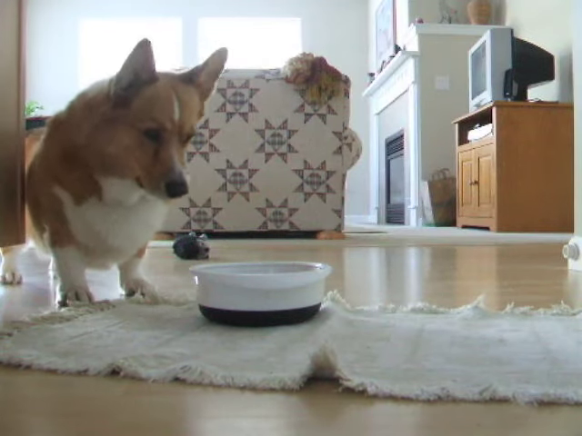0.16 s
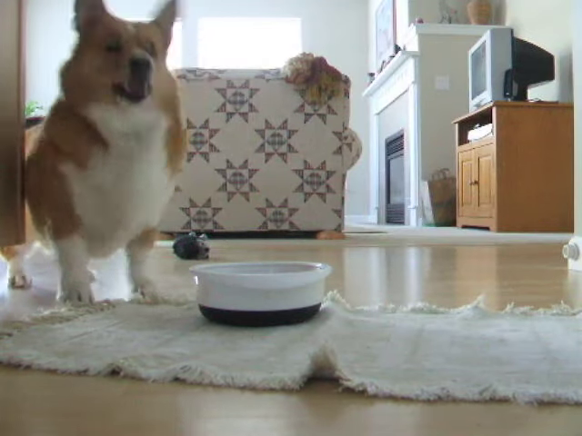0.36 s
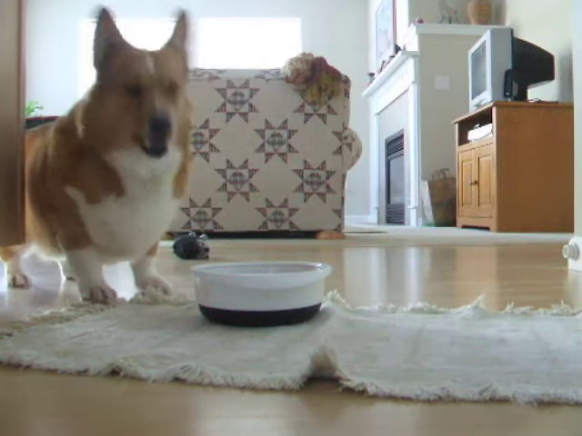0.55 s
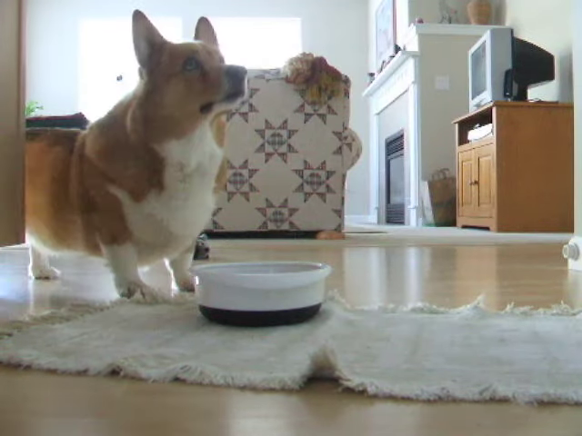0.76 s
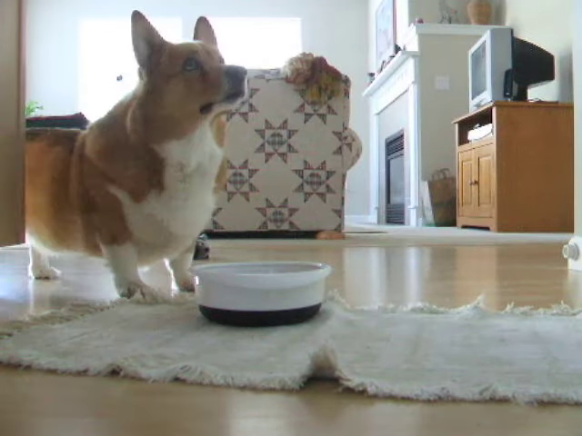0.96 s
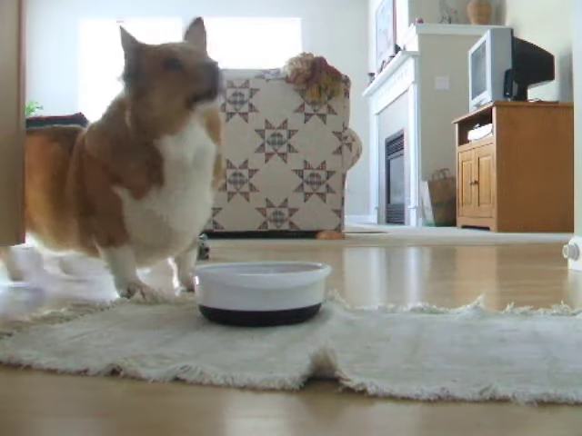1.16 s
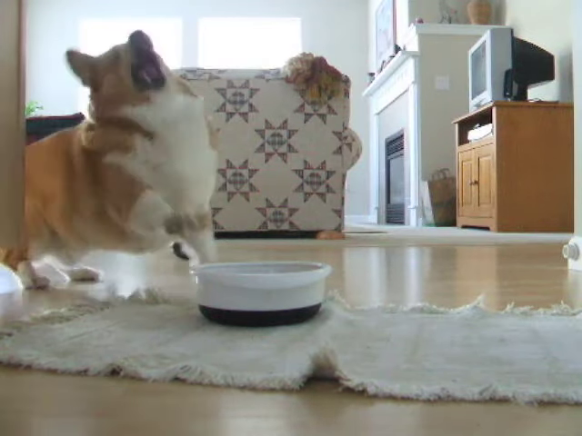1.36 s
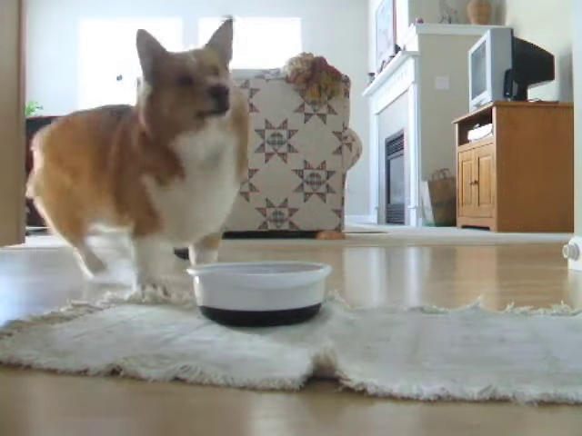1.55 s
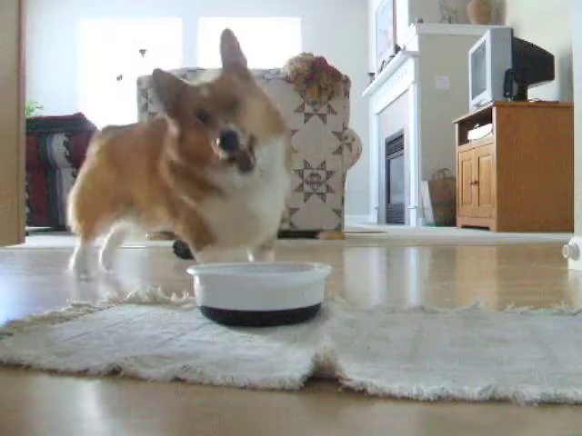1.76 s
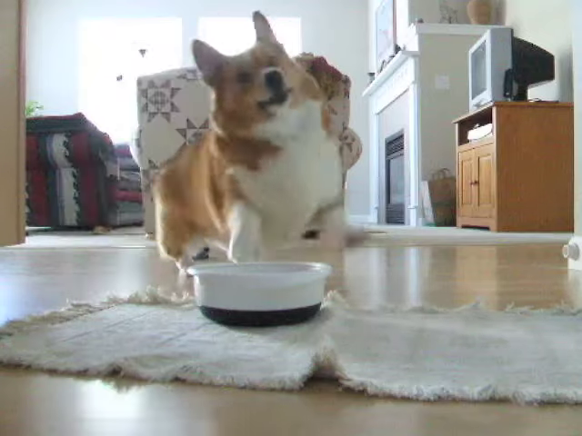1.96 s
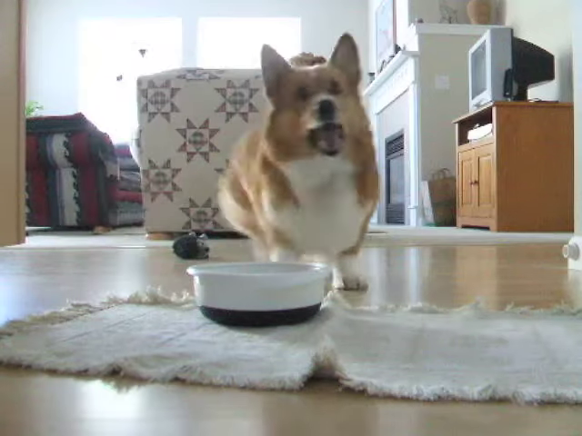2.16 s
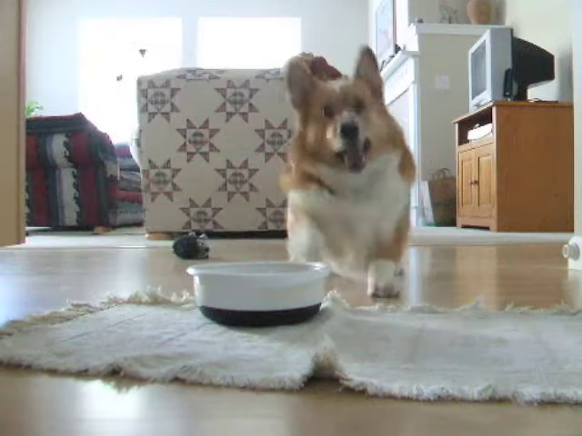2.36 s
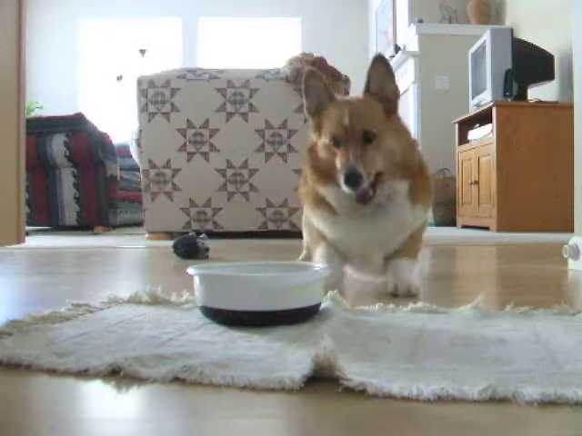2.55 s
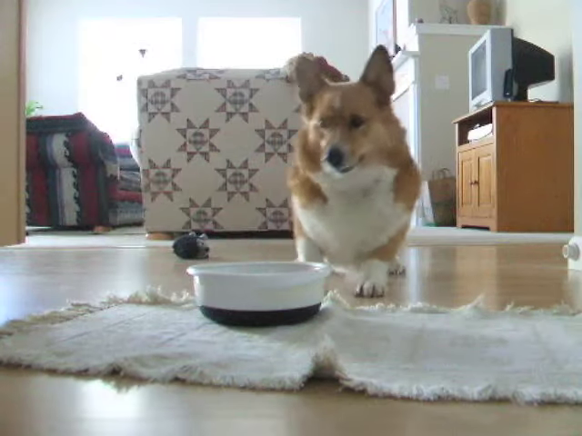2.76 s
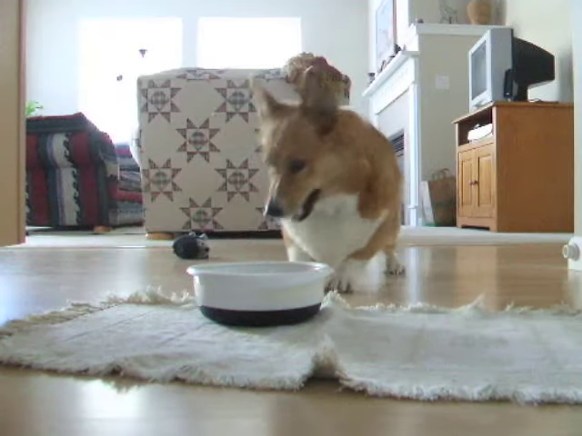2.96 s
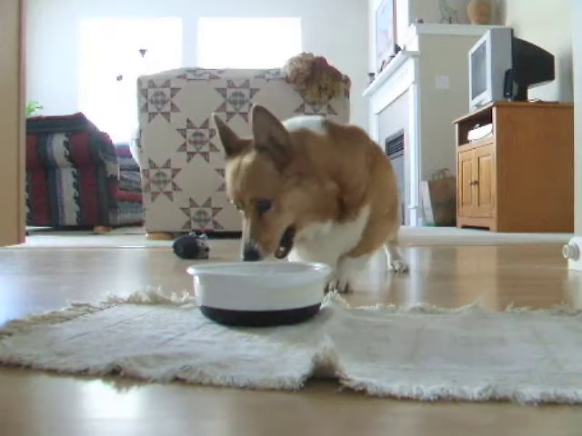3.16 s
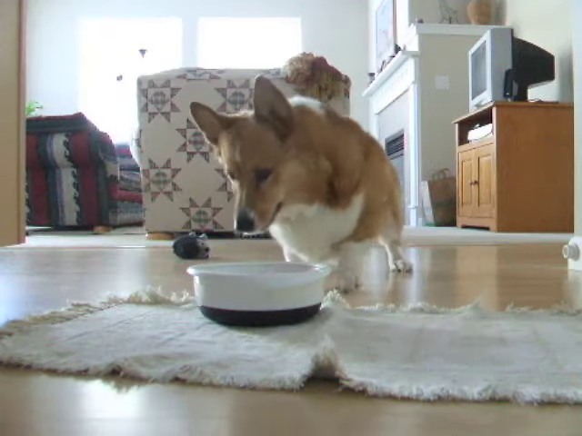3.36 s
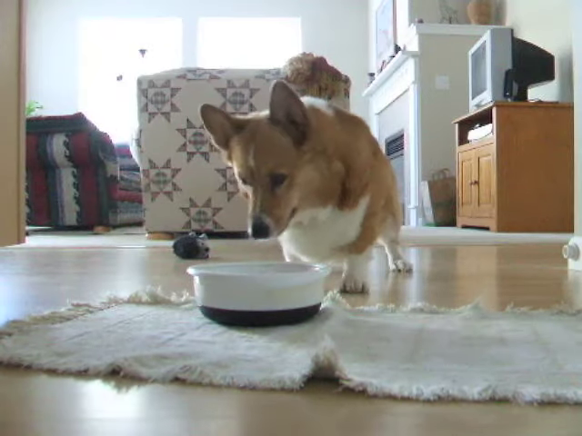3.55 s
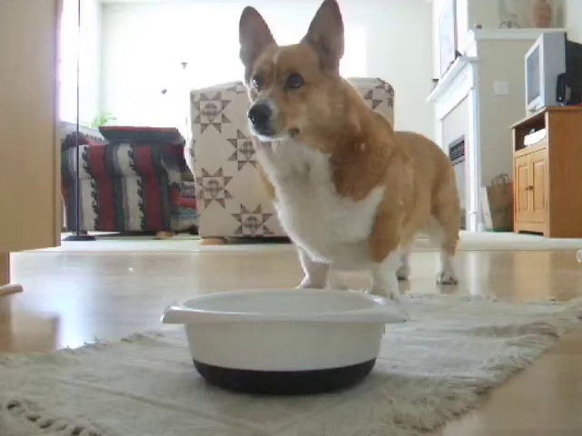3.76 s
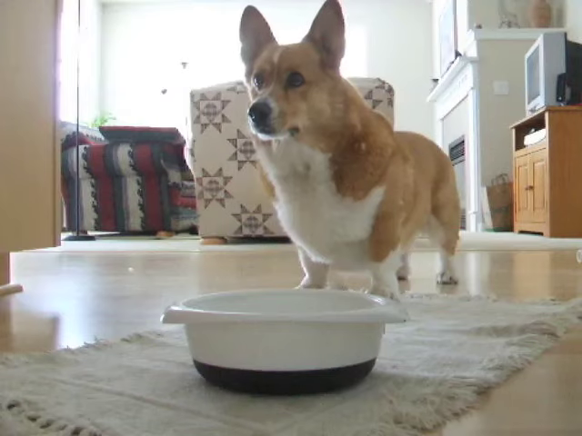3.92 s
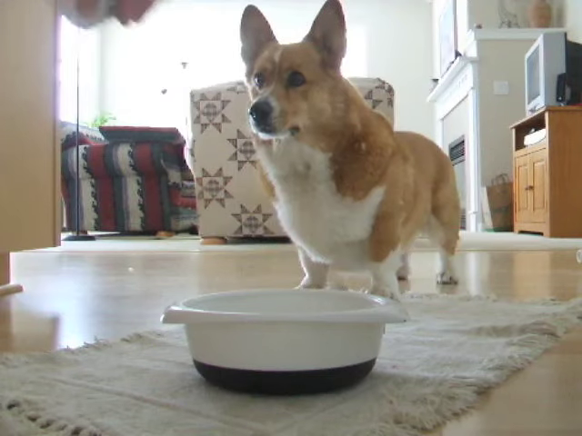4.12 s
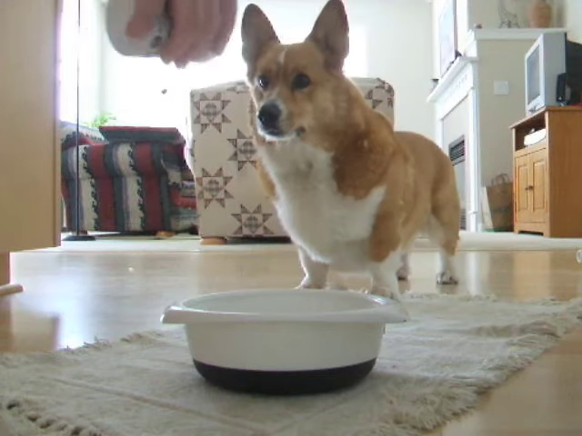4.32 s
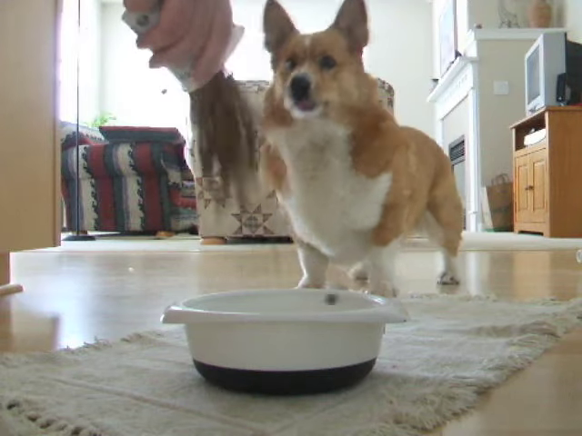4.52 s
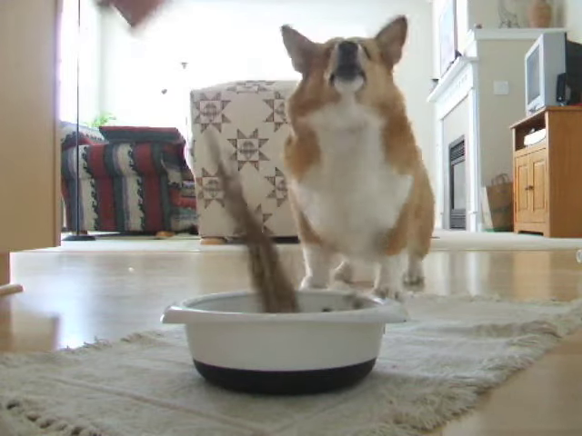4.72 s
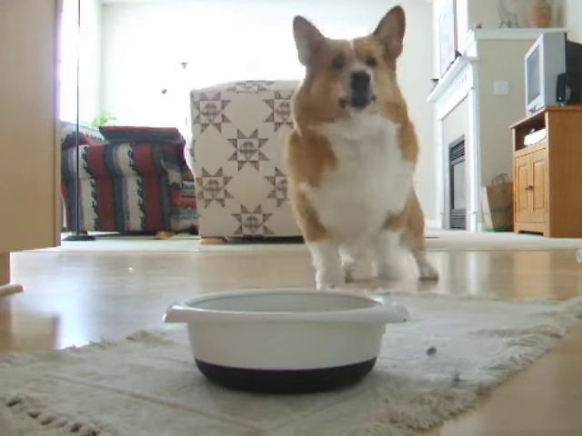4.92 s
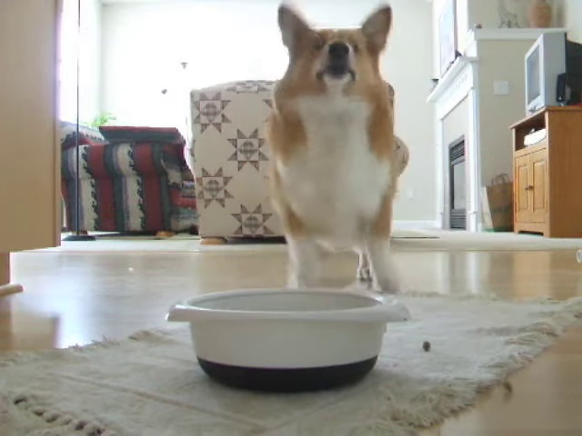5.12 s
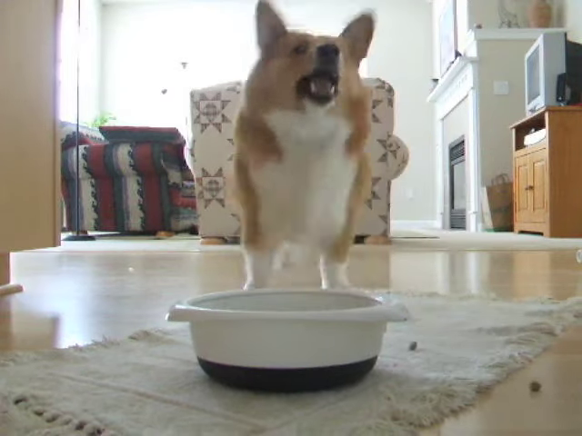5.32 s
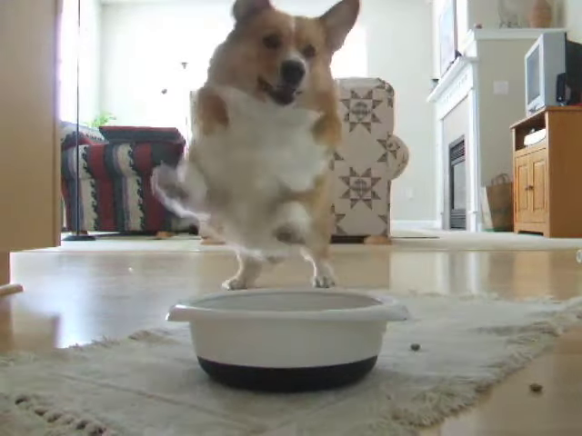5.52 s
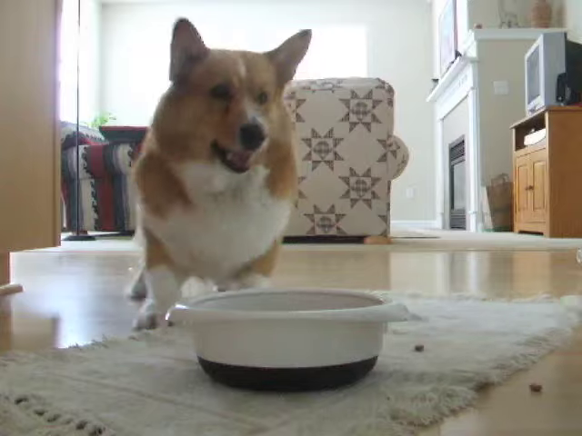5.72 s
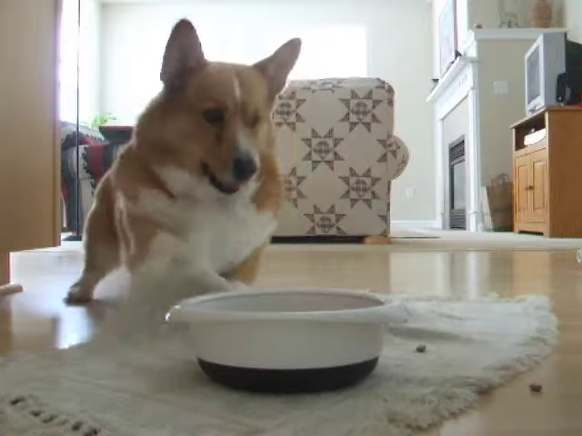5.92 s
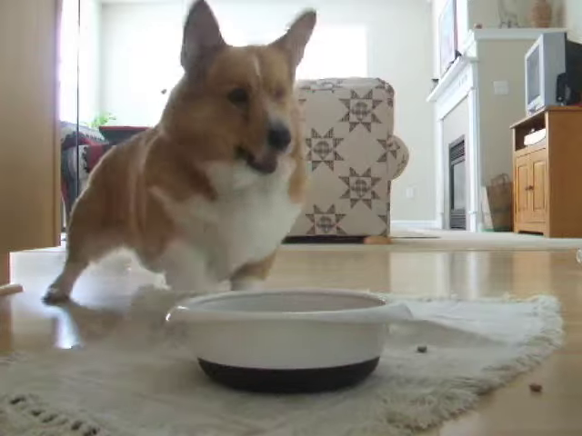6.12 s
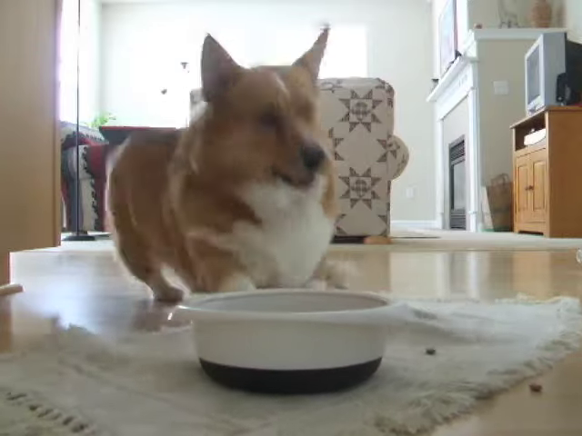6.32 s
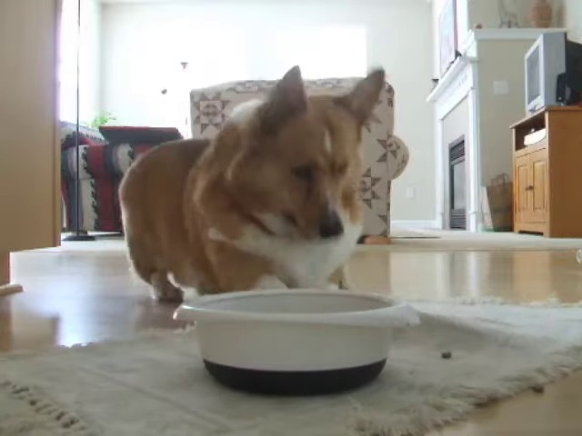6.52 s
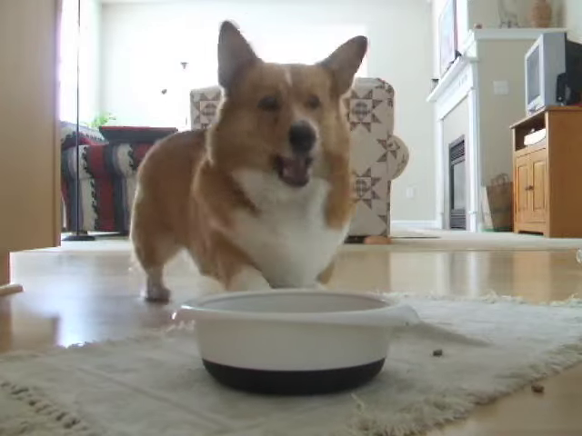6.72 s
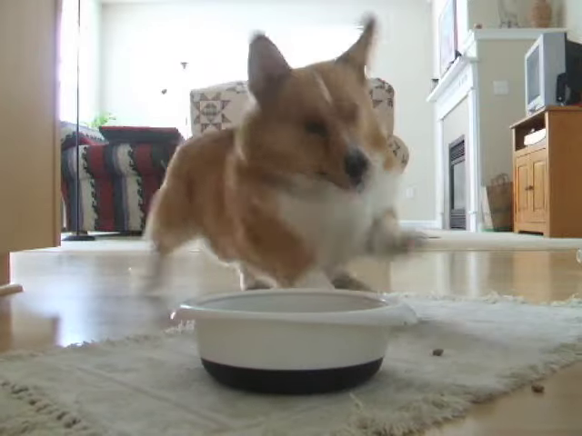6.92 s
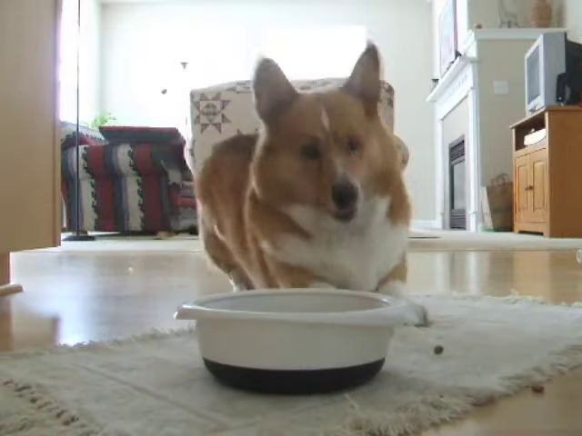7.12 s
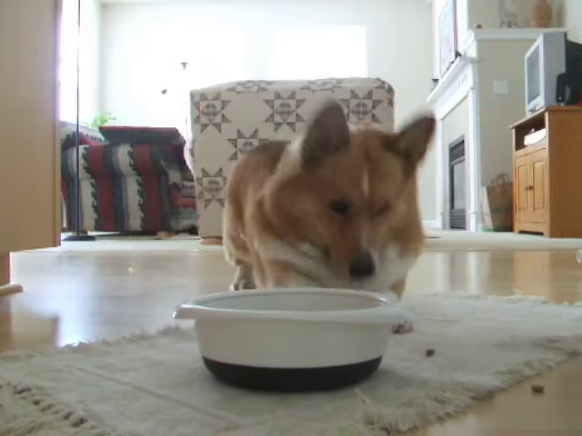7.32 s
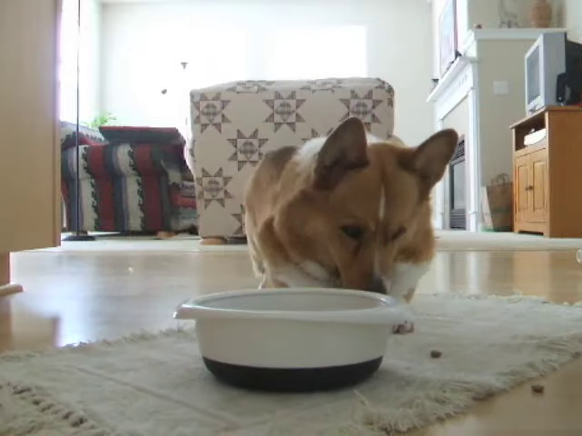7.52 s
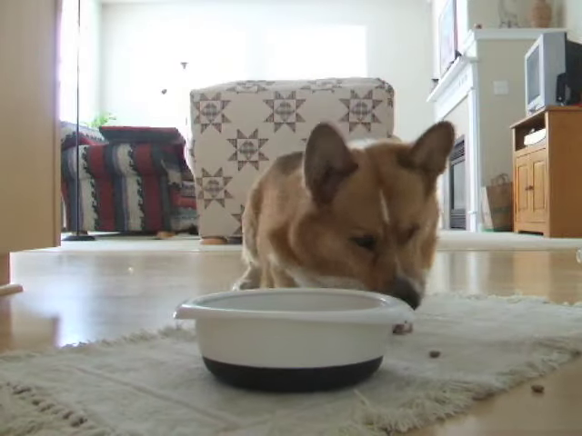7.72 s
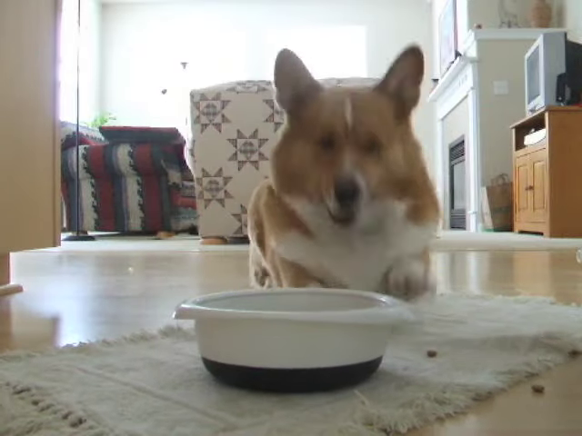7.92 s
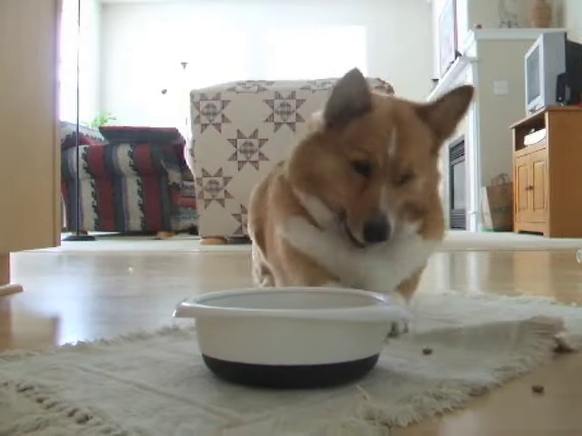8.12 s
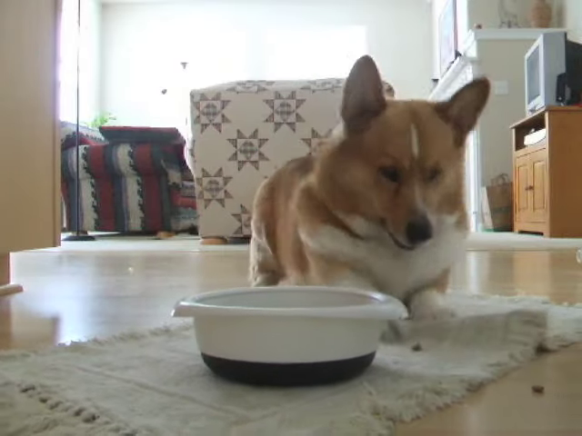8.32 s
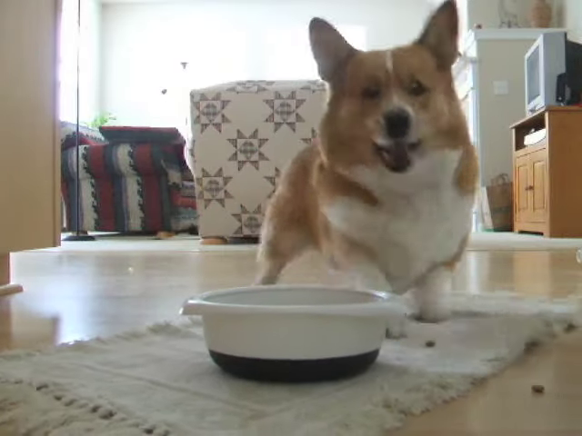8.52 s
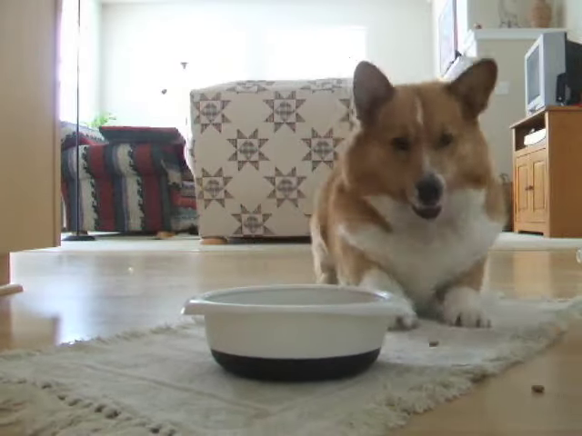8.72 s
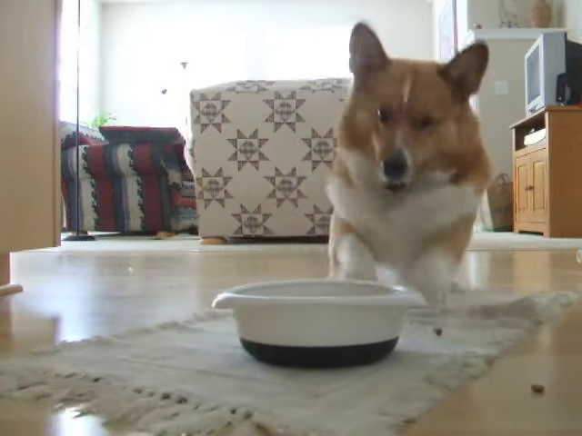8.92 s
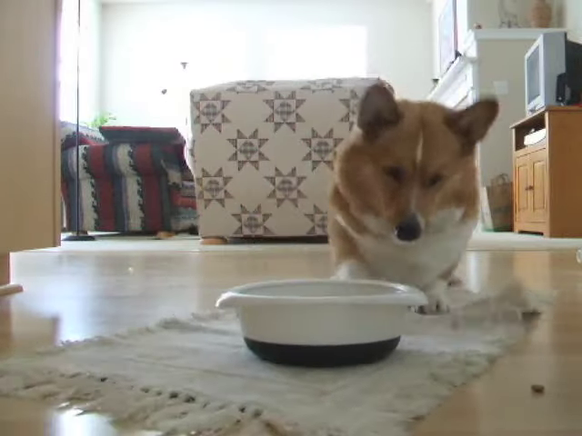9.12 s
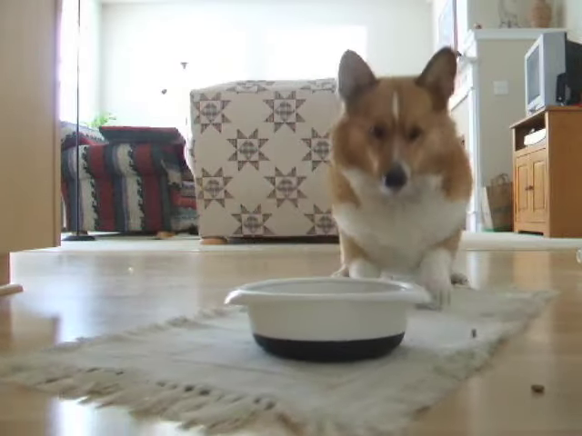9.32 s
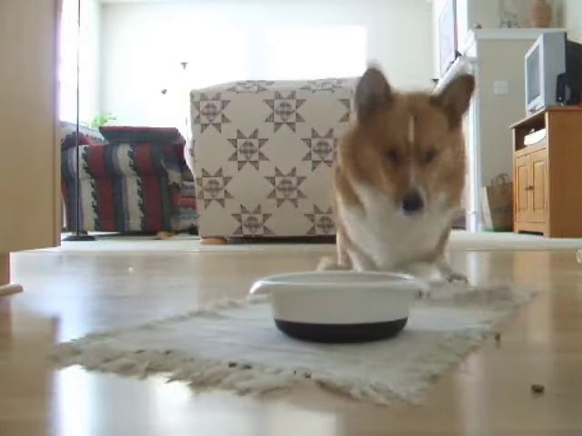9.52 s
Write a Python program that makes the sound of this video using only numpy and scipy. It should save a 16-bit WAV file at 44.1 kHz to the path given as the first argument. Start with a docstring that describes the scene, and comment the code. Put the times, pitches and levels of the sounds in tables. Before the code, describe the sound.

Close floor-level pickup in an echoing living room with low rumble, hiss and hum. Brittle claw clicks and brief scrapes scatter over wooden boards, then thin out to near quiet. Dry kibble strikes and showers into a hollow plastic bowl for under half a second. The dog's scampering resumes, with dull paw thumps on rug and boards, a few sharp clicks and short woven rustles before it calms.

```python
"""Claws click and skid on a hardwood floor as a small dog dances for its food; its paws thump on boards and rug.
A handful of kibble rattles into a plastic bowl, and a live living room rings over faint hiss, rumble and hum.
One microphone stands on the floor, close by. Contacts are noise cracks exciting decaying resonances, strokes are
trains of tiny random impacts, and lip smacks are noise in a rising resonance; diffuse noise tails are the room."""
import sys
import numpy as np
from scipy import signal
from scipy.fft import rfft, irfft
from scipy.io import wavfile
from scipy.ndimage import uniform_filter1d

SR = 44100
rng = np.random.default_rng(int(sys.argv[2]) if len(sys.argv) > 2 else 0)


def store_wav(level_fs):
    """Save 16-bit WAV to argv[1]."""
    pcm = np.round(np.clip(np.atleast_2d(level_fs), -1, 1) * 32767)
    wavfile.write(sys.argv[1], SR, pcm.T.astype(np.int16))


N = 426447
RING = np.arange(SR // 2) / SR  # time axis of room and floor, s
SHORT = np.arange(SR // 16) / SR  # time axis of one contact, s


def undb(db):
    """Decibels to gain."""
    return 10 ** (np.asarray(db) / 20)


def level(x, db):
    """Set the rms level."""
    return x * undb(db) / np.sqrt(np.mean(x ** 2))


def peak(x, db, size=88):
    """Set the rms level of the loudest stretch of size samples."""
    return x * undb(db) / np.sqrt(uniform_filter1d(x ** 2, size, mode="constant").max())


def unit_energy(x):
    """Scale a signal to unit energy."""
    return x / np.linalg.norm(x)


def add(out, start_s, x):
    """Mix x into out from start_s."""
    i = max(int(start_s * SR), 0)
    out[i:i + len(x)] += x[:max(len(out) - i, 0)]


def colour(x, points, size=2048):
    """Minimum-phase filter of unit energy with a (frequency_hz, level_db) spectrum."""
    hz, db = np.transpose(points)
    bins_hz = np.arange(size // 2 + 1) * SR / size
    log_gain = np.log(undb(np.interp(np.log(bins_hz + 1), np.log(hz), db)))
    # folding the cepstrum onto positive time makes the filter causal
    cepstrum = irfft(log_gain)[:size // 2]
    cepstrum[1:] *= 2
    response = irfft(np.exp(rfft(cepstrum, size)))
    return signal.fftconvolve(x, unit_energy(response))[:len(x)]


def ring(modes, stretch=1, jitter=.03):
    """Unit-energy sum of decaying modes; every contact point detunes them a little."""
    y = np.zeros(len(SHORT))
    for hz, width_hz, db in modes:
        detuned_hz = hz * stretch * (1 + jitter * rng.standard_normal())
        decay = np.exp(-np.pi * width_hz * SHORT)
        y += undb(db) * np.sqrt(width_hz) * decay * np.cos(2 * np.pi * detuned_hz * SHORT)
    return unit_energy(y)


def burst(decay_s):
    """Unit-energy crack: noise that dies away exponentially."""
    return unit_energy(rng.standard_normal(len(SHORT)) * np.exp(-SHORT / decay_s))


def grains(count, rate_hz, spread_db):
    """Tiny impacts of uneven size, scattered at random over count samples."""
    hits = rng.random(count) < rate_hz / SR
    return hits * rng.choice([-1, 1], count) * undb(spread_db * rng.standard_normal(count))


def swell(length_s, peak_at=0.45):
    """Envelope of a short stroke: it grows until the share peak_at, then lets go."""
    progress = np.linspace(0, 1, int(length_s * SR))
    phase = np.interp(progress, [0, peak_at, 1], [0, np.pi / 2, np.pi])
    return np.sin(phase).clip(0) ** 0.85


# the living room's ring by band: frequency_hz, t60_s, level_db
ROOM_BANDS = [(60, 0.66, 5), (207, 0.54, -4), (700, 0.85, -9), (1950, 1, -11.5), (3920, 0.64, -5.5),
              (7000, 0.5, -7.5)]


def room_responses(count=12, build_s=0.0077, gap_s=0.0011):
    """Noise tails for several spots on the floor; each band decays at its own rate after a quick build-up."""
    hz, t60_s, db = np.transpose(ROOM_BANDS)
    log_f = np.log(np.arange(len(RING) // 2 + 1) * SR / len(RING) + 1)
    spectra = rfft(rng.standard_normal((count, len(RING))))
    tails = np.zeros((count, len(RING)))
    for band, t60, gain_db in zip(np.eye(len(hz)), t60_s, db):
        noise = irfft(spectra * np.interp(log_f, np.log(hz), band), len(RING))
        tails += noise * undb(gain_db - 60 * RING / t60)
    build_up = 1 - np.exp(-np.maximum(RING - gap_s, 0) / build_s)
    return tails * build_up / np.sqrt(SR * 0.023)


def echoes(x, rooms):
    """The room's answer to a sound made on one randomly chosen spot of the floor."""
    return signal.fftconvolve(x, rooms[rng.integers(len(rooms))])


def in_room(x, rooms, wet_db):
    """The direct sound and its echoes."""
    y = undb(wet_db) * echoes(x, rooms)
    y[:len(x)] += x
    return y


# spectrum of the still air at the microphone: frequency_hz, relative level_db
AIR_SPECTRUM = [(24, -37.5), (40, 1), (59, -3), (75, -17), (130, -5.5), (162, -16), (201, -14.5),
                (298, -22.5), (348, -19.5), (405, -22), (452, -24), (6350, -26.5), (7400, -30),
                (9620, -60.5), (16300, -120)]
AIR_DB = -51
HUM_HZ, HUM_DB = 113, -72.5


def still_room(size=8192):
    """Low rumble and even hiss as coloured noise, with an appliance's hum as one steady sine."""
    air = colour(rng.standard_normal(N + size), AIR_SPECTRUM, size=size)[size:]
    hum = np.sin(2 * np.pi * HUM_HZ * np.arange(N) / SR)
    return level(air, AIR_DB) + level(hum, HUM_DB)


# paws dragging the rug: start_s, length_s, level_db
RUG_DRAGS = [(8.52, 0.19, -43), (8.627, 0.054, -30), (8.888, 0.15, -46.5), (9.355, 0.11, -44),
             (9.523, 0.088, -41.5)]
# spectrum of the rug's rustle: frequency_hz, relative level_db
RUG_SPECTRUM = [(80, 6), (300, -1), (750, 11), (1500, 1), (3500, 8), (7000, -1)]


def rug(rooms, fibre_rate_hz=3000, spread_db=4, wet_db=-2):
    """The woven rug rustles over the boards: coloured random impacts swell and fade with each push."""
    out = np.zeros(N)
    for start_s, length_s, db in RUG_DRAGS:
        fibres = colour(grains(int(length_s * SR), fibre_rate_hz, spread_db), RUG_SPECTRUM)
        add(out, start_s, in_room(level(fibres * swell(length_s), db), rooms, wet_db))
    return out


# the dog's soft mouth noises: start_s, length_s, pitch_hz (at mid-length), level_db
MOUTH_NOISES = [(0.614, 0.059, 1438, -49), (0.681, 0.022, 927, -48), (0.778, 0.014, 646, -42),
                (2.491, .06, 871, -40.5), (2.855, .12, 1051, -45.5), (5.434, 0.039, 1344, -35),
                (5.934, .014, 817, -42.5), (8.143, 0.014, 1070, -43), (9.599, .016, 1410, -47.5)]
JAW_OCTAVES_PER_S = 4.5


def mouth(rooms, width_hz=130, wet_db=-4):
    """The dog smacks its lips: noise in one broad resonance that rises as the jaw opens."""
    out = np.zeros(N)
    lowpass = signal.butter(1, width_hz, fs=SR, output="sos")
    for start_s, length_s, pitch_hz, db in MOUTH_NOISES:
        shape = swell(length_s)
        flutter = signal.sosfilt(lowpass, rng.standard_normal((2, len(RING))))[:, -len(shape):]
        octaves = JAW_OCTAVES_PER_S * length_s * np.linspace(-.5, .5, len(shape))
        phase = 2 * np.pi * np.cumsum(pitch_hz * 2 ** octaves) / SR
        smack = shape * (flutter[0] * np.cos(phase) + flutter[1] * np.sin(phase))
        add(out, start_s, in_room(level(smack, db), rooms, wet_db))
    return out


# the sprung floor with the lowest room resonances: frequency_hz, t60_s, relative level_db
FLOOR_MODES = [(48, 0.08, -10.5), (67.7, 0.047, -10), (91.2, 0.19, -2), (109.5, 0.31, -3),
               (151.7, 0.26, -4), (210.2, 0.25, -1.5), (250.3, 0.23, -0.5), (338.5, 0.18, -7),
               (545, 0.29, -11.5), (770, .25, -15.5)]


def thump(db, push_s=.003, jitter=0.022):
    """Weight presses the floor down and it swings back: a short push excites the floor's decaying modes."""
    modes = np.zeros(len(RING))
    for hz, t60_s, gain_db in FLOOR_MODES:
        detuned_hz = hz * (1 + jitter * rng.standard_normal())
        decay = np.exp(-np.log(1000) * RING / t60_s)
        modes += undb(gain_db) * decay * np.sin(2 * np.pi * detuned_hz * RING)
    push = SHORT * np.exp(-4 * SHORT / push_s)
    return peak(-signal.fftconvolve(modes, push), db, size=441)


# the pour: a trickle through the fingers, then the handful, which thins out until the hand is empty
TRICKLE_S, TRICKLE_DB = 4.46, -32.5
HANDFUL_S, HANDFUL_DB, THINNING_DB_PER_S = 4.668, -24, 21
EMPTY_S, POUR_ATTACK_S, POUR_RELEASE_S = 4.913, 0.018, 0.068


def pour_flow():
    """Strength of the stream from the first trickle on: the handful drops, thins, and the last pellets settle."""
    t = TRICKLE_S + np.arange(SR) / SR

    def rise(start_s):
        return 1 - np.exp(-np.maximum(t - start_s, 0) / POUR_ATTACK_S)

    trickle = rise(TRICKLE_S) * undb(TRICKLE_DB)
    handful = rise(HANDFUL_S) * undb(HANDFUL_DB - THINNING_DB_PER_S * (t - HANDFUL_S))
    settling = np.exp(-np.maximum(t - EMPTY_S, 0) / POUR_RELEASE_S)
    return np.hypot(trickle, handful) * settling


# resonances of the plastic bowl: frequency_hz, width_hz, relative level_db
BOWL_MODES = [(443, 29, -22.5), (560, 27, -17), (748, 69, 5), (870, 100, 0), (1260, 250, -10.5),
              (1580, 150, -1), (2028, 130, -10), (2400, 150, -2), (3040, 250, -6), (3510, 290, 11.5),
              (4030, 500, 9.5), (5020, 540, 9), (6340, 150, 7)]
# spectrum of a pellet's crack: frequency_hz, relative level_db
KIBBLE_SPECTRUM = [(150, -45), (300, -16.5), (420, 0), (750, 1), (1300, 2), (2200, 10), (3500, 8),
                   (5500, 7), (7200, -4)]


def kibble_hit(crack_s=0.0055):
    """One hard pellet cracks against the bowl and rings its wall, a little differently on every spot."""
    modes = [(hz, width_hz, db + 2 * rng.standard_normal()) for hz, width_hz, db in BOWL_MODES]
    return ring(modes, jitter=0.012) + colour(burst(crack_s), KIBBLE_SPECTRUM)


# single pieces of kibble striking the bowl: start_s, level_db
PIECES = [(4.216, -29.5), (4.259, -33.5), (4.394, -39.5), (4.505, -10), (4.659, -14), (4.682, -10.5),
          (4.712, -18), (4.889, -20)]
BOWL_ROCKS_S, BOWL_ROCKS_DB = 4.783, -26.5


def kibble(rooms, spots=10, rate_hz=80, spread_db=3.0, wet_db=-5):
    """Random pellets rain on several spots of the bowl, single pieces strike it, and it bumps the floor."""
    flow = pour_flow()
    pellets = level(np.array([grains(len(flow), rate_hz, spread_db) for _ in range(spots)]), 0)
    stream = sum(signal.fftconvolve(spot * flow, kibble_hit()) for spot in pellets)
    out = np.zeros(N)
    add(out, TRICKLE_S, in_room(stream / np.sqrt(spots), rooms, wet_db))
    for start_s, hit_db in PIECES:
        add(out, start_s, in_room(peak(kibble_hit(), hit_db), rooms, wet_db))
    add(out, BOWL_ROCKS_S, thump(BOWL_ROCKS_DB, push_s=0.0064))
    return out


# padded footfalls, mostly on the rug: start_s, slap_db and thump_db (both before the trims in paws)
PAW_STEPS = [(1.831, -30, -34), (2.284, -31, -32), (2.477, -27, -29), (5.265, -34, -49),
             (5.473, -34.5, -28), (5.53, -36.5, -30.5), (5.673, -23, -31), (6.3, -24, -21.5),
             (6.53, -32.5, -27), (6.738, -29.5, -27), (6.771, -21.5, -22.5), (6.996, -24, -21.5),
             (7.049, -27, -25), (7.348, -22.5, -14.5), (7.42, -29.5, -18.5), (8.069, -29.5, -27),
             (8.184, -23, -19), (8.354, -30.5, -22.5), (8.416, -23.5, -15.5), (8.611, -17.5, -18),
             (9.024, -30, -29), (9.117, -37.5, -32.5), (9.585, -41.5, -40)]
# spectrum of the pad's slap: frequency_hz, relative level_db
SLAP_SPECTRUM = [(100, -21), (230, 0.5), (400, -2), (560, -3), (760, 0), (1100, -9), (2200, -13.5),
                 (4000, -10.5), (7000, -28.5)]
# a harder landing squashes the pad faster: the push lasts PUSH_S at PUSH_AT_DB and halves every PUSH_HALVES_DB
PUSH_S, PUSH_AT_DB, PUSH_HALVES_DB = 0.0067, -25.5, 14


def paws(rooms, thump_trim_db=1, slap_trim_db=-2, slap_s=0.012, pad_s=0.00062, wet_db=-3):
    """A cushioned step: the pad gives, slaps dully, and the floor thumps, more sharply under a hard landing."""
    out = np.zeros(N)
    for start_s, slap_db, thump_db in PAW_STEPS:
        slap = colour(burst(slap_s) * (1 - np.exp(-SHORT / pad_s)), SLAP_SPECTRUM)
        add(out, start_s, in_room(peak(slap, slap_db + slap_trim_db, size=330), rooms, wet_db))
        push_s = PUSH_S * 2 ** ((PUSH_AT_DB - thump_db) / PUSH_HALVES_DB)
        add(out, start_s, thump(thump_db + thump_trim_db, push_s=push_s))
    return out


# claws skidding over the boards: start_s, length_s, level_db (direct sound)
SKIDS = [(0.363, 0.044, -29), (1.199, 0.051, -26), (1.254, 0.051, -25.5), (1.563, 0.051, -29),
         (1.973, 0.041, -29.5), (2.052, .037, -33.5), (2.138, .055, -36.5), (2.317, 0.027, -25),
         (2.597, 0.07, -34), (2.825, .02, -33), (2.918, .07, -35.5), (3.084, 0.037, -35.5),
         (3.379, .06, -44), (5.035, 0.072, -26.5), (5.116, 0.087, -26.5), (5.204, 0.13, -30.5),
         (5.326, 0.058, -24.5), (5.47, .017, -23.5), (5.658, 0.03, -28), (5.768, .03, -25),
         (6.159, .05, -39.5), (6.224, 0.046, -34), (6.266, 0.029, -22), (7, 0.023, -23.5),
         (7.115, 0.021, -28.5), (7.294, .057, -40.5), (7.516, 0.024, -28), (7.688, 0.033, -28),
         (7.87, 0.084, -27), (9.062, .048, -32.5), (9.105, 0.03, -24.5), (9.132, .046, -26.5),
         (9.605, 0.07, -40)]
# resonances of a claw on varnished wood: frequency_hz, width_hz, relative level_db
CLAW_MODES = [(2570, 300, -30), (3536, 410, 4.5), (4290, 750, 3), (5620, 560, 3.5), (6340, 250, -7.5)]
# spectra of the claw's crack and the board's knock: frequency_hz, relative level_db
CLICK_SPECTRUM = [(300, -56.5), (1800, -26), (2600, -11.5), (3400, 7.5), (4400, 2), (5500, -4),
                  (7000, -8.5)]
KNOCK_SPECTRUM = [(120, -13), (260, -6), (430, -3), (800, -3), (1300, -12), (2000, -7), (3200, -1),
                  (7000, -40.5)]
# what the claws throw out into the room, all directions together: frequency_hz, relative level_db
CLAW_SPREAD = [(300, -20.5), (900, -11), (1800, -11.5), (2600, -10), (3400, 0.5), (4000, -2), (5000, -3),
               (6300, -1), (7200, -5.5)]
SKID_PEAK = 0.53  # share of a skid that passes before the claws bear down hardest


def skids(rooms, claws=4, slip_rate_hz=650, spread_db=4.5, board_db=-16, wet_db=0.0, grit_db=-3, jitter=.045):
    """Four sliding claws catch and slip on the grain of the wood, each ringing at every slip."""
    out = np.zeros(N)
    for start_s, length_s, db in SKIDS:
        count = int(length_s * SR)
        scrape = 0
        for _ in range(claws):
            slips = grains(count, slip_rate_hz, spread_db) * swell(length_s, SKID_PEAK)
            slip_sound = ring(CLAW_MODES, jitter=jitter)
            slip_sound += colour(burst(0.0045), CLICK_SPECTRUM)
            slip_sound += undb(board_db) * colour(burst(0.0062), KNOCK_SPECTRUM)
            slip_sound += undb(grit_db) * colour(burst(0.0025), CLAW_SPREAD)
            scrape = scrape + signal.fftconvolve(slips, slip_sound)
        # rms level over the length of the stroke
        scrape = unit_energy(scrape) * undb(db) * np.sqrt(count)
        add(out, start_s, in_room(scrape, rooms, wet_db))
    return out


TOE_DETUNE = .04  # relative spread of each claw's resonances


def claw_click(stretch, claws=4, scatter_s=.003, crack_db=-4, crack_s=0.0033,
               board_db=3.5, board_s=0.0034, board_rise_s=.0007):
    """Four claws land one just after the other; each cracks and rings, and the board rings on briefly."""
    click = np.zeros(len(SHORT))
    for toe in range(claws):
        lag_s = scatter_s * (toe + rng.uniform(-.4, .4) * (toe > 0)) / claws
        crack = colour(burst(crack_s), CLICK_SPECTRUM)
        claw = ring(CLAW_MODES, stretch=stretch, jitter=TOE_DETUNE) + undb(crack_db) * crack
        add(click, lag_s, undb(-3 * abs(toe - 1)) * claw)  # the second claw lands hardest
    board = colour(burst(board_s) * (1 - np.exp(-SHORT / board_rise_s)), CLICK_SPECTRUM)
    return unit_energy(click) + undb(board_db) * board


# claws landing on bare wood: start_s, click_db (before the trim in taps), thump_db, room_db (click's echoes)
TAPS = [(0.419, -11.5, -47, 0), (0.540, -14, -51, 0), (0.552, -17, -38, -7), (1.28, -13.5, -43, 3),
        (1.333, -9, -41, 4.5), (1.503, -7.5, -40, -1), (1.536, -18, -33.5, 12.5), (1.668, -14, -53, 4),
        (1.715, -13.5, -39.5, 5.5), (1.817, -6, -34, 2), (1.962, -16.5, -33.5, -1),
        (2.0225, -13.5, -46, -1.5), (2.1147, -10, -32.5, 5.5), (2.1904, -9.5, -21.5, 3.5),
        (2.271, -17.5, -55, 5.5), (2.424, -9.5, -24, 0.5), (2.468, -10.5, -21.5, 3.5),
        (2.649, -22.5, -36, 0), (2.743, -9.5, -36, 2.5), (2.987, -21.5, -42, 1.5), (3.294, -37.5, -51, 1),
        (3.469, -27, -62, 3), (3.484, -26, -53, -4), (5.073, -11.5, -69, 0.5), (5.393, -7.5, -26.5, 1.5),
        (5.708, -8, -29.5, 0.5), (5.809, -15.5, -28.5, 5.5), (6.0509, -10, -23.5, 0),
        (6.371, -13.5, -27, 1.5), (6.4375, -16.5, -27, 5.5), (6.855, -11, -58, 3.5), (7.089, -15, -35, 2),
        (7.214, -15, -49, 3.5), (7.563, -10.5, -53, 1), (7.765, -13, -44.5, 2), (8.701, -9, -27.5, -0.5),
        (8.734, -16.5, -38, 6.5)]
# the board knocks at a level between click and thump: share of the thump 0-1, offset in dB
KNOCK_WEIGHT_SHARE, KNOCK_DB = .42, -10


def taps(rooms, click_trim_db=-2, knock_s=0.0071, knock_room_db=0, paw_detune=0.06):
    """A paw on bare wood: the claws click, the board knocks, the floor thumps."""
    out = np.zeros(N)
    spread = colour(signal.unit_impulse(len(SHORT)), CLAW_SPREAD)
    for start_s, click_db, thump_db, room_db in TAPS:
        stretch = 1 + paw_detune * rng.standard_normal()
        click = peak(claw_click(stretch), click_db + click_trim_db, size=176)
        add(out, start_s, click)
        # the walls hear the click from every side, so its sharp resonances even out
        add(out, start_s, undb(room_db) * np.linalg.norm(click) * echoes(spread, rooms))
        board_db = click_db + KNOCK_WEIGHT_SHARE * (thump_db - click_db) + KNOCK_DB
        knock = peak(colour(burst(knock_s), KNOCK_SPECTRUM), board_db, size=220)
        add(out, start_s, in_room(knock, rooms, knock_room_db))
        add(out, start_s, thump(thump_db, push_s=0.0084))
    return out


# the claw sounds drop out abruptly between these times, clicks, skids and their echoes alike: from_s, to_s
CLAWS_SILENT = (.738, 1.15)


def scene():
    """Everything reaches one microphone, carried alike on two channels."""
    rooms = room_responses()
    claws = taps(rooms) + skids(rooms)
    claws[int(CLAWS_SILENT[0] * SR):int(CLAWS_SILENT[1] * SR)] = 0
    mono = still_room() + rug(rooms) + mouth(rooms) + kibble(rooms) + paws(rooms) + claws
    return np.array([mono, mono])


LOW_HZ, TOP_HZ = 44, 7250  # edges of the microphone's range


def record(dry):
    """The small microphone loses the deepest bass; the hardest clicks clip and the top is cut steeply."""
    thin = signal.sosfilt(signal.butter(6, LOW_HZ, "high", fs=SR, output="sos"), dry)
    clipped = np.clip(thin, -.82, .82)
    return signal.sosfilt(signal.cheby1(12, .3, TOP_HZ, fs=SR, output="sos"), clipped)


dry = scene()
out = record(dry)
store_wav(out)
```